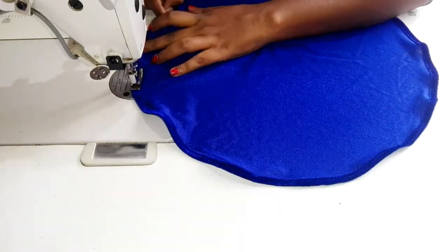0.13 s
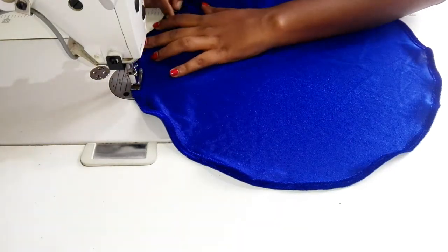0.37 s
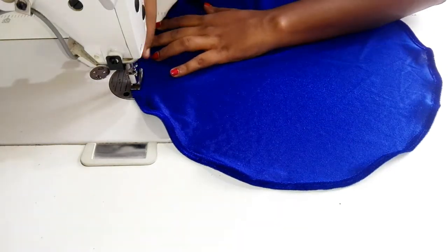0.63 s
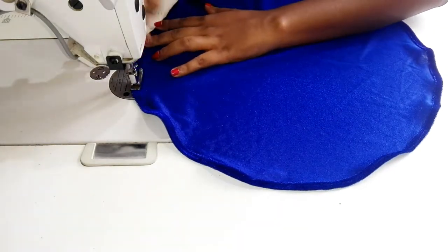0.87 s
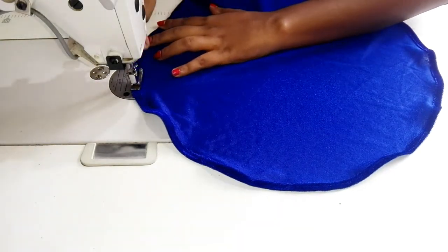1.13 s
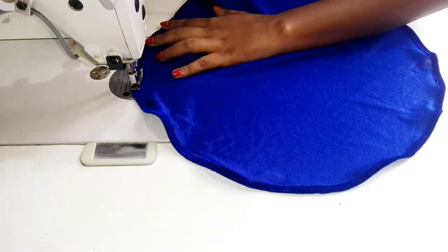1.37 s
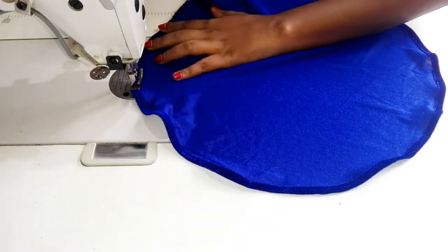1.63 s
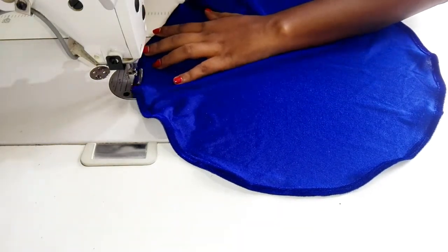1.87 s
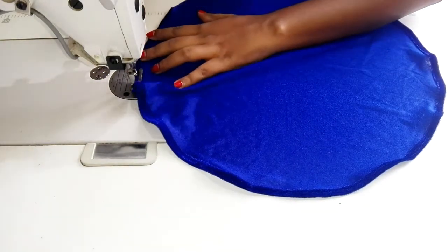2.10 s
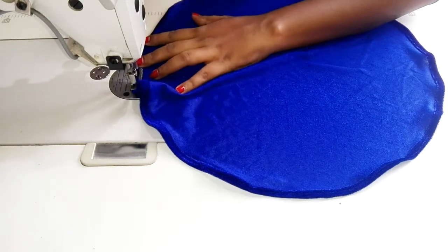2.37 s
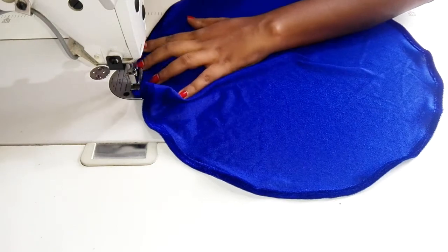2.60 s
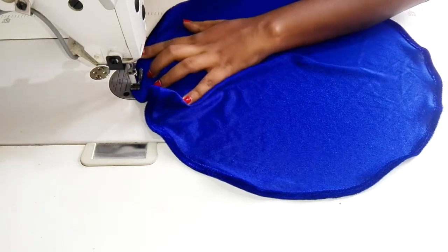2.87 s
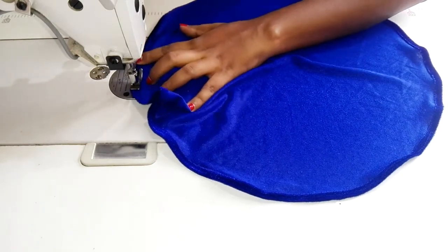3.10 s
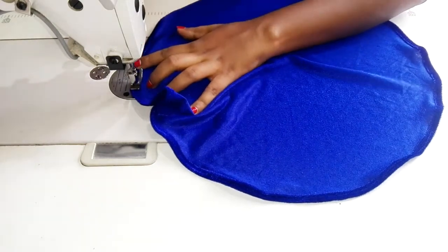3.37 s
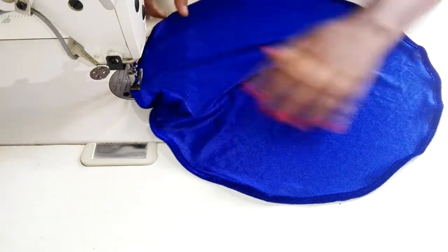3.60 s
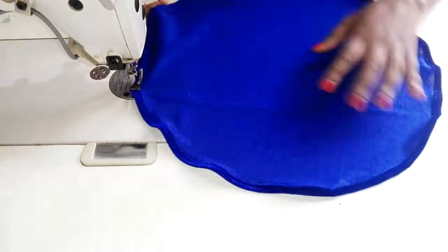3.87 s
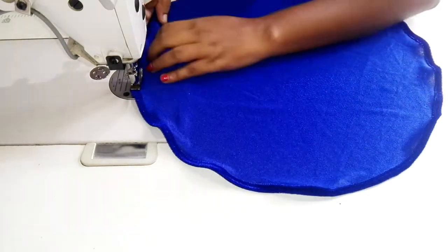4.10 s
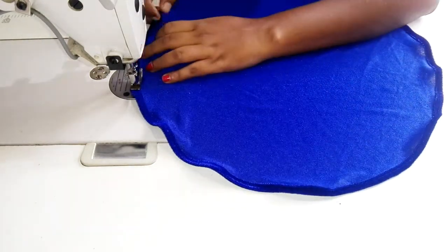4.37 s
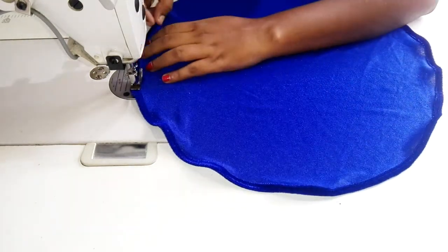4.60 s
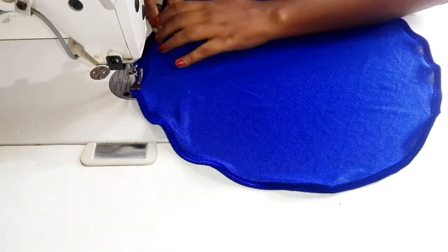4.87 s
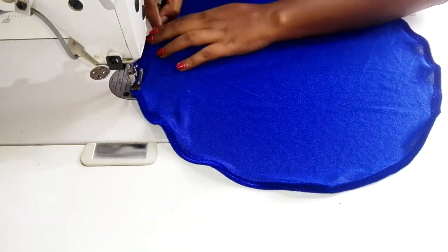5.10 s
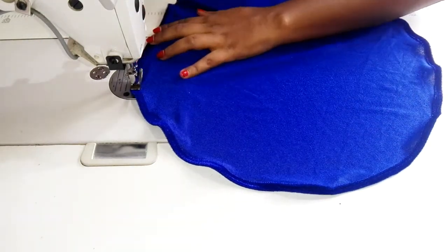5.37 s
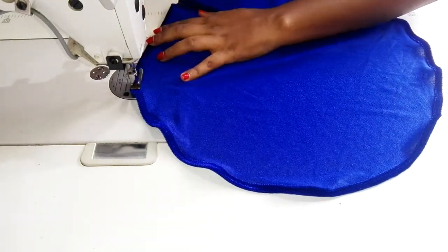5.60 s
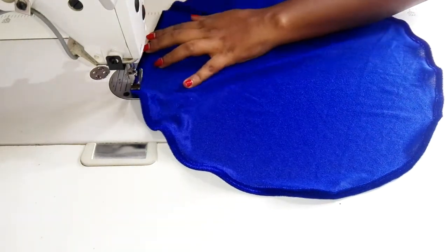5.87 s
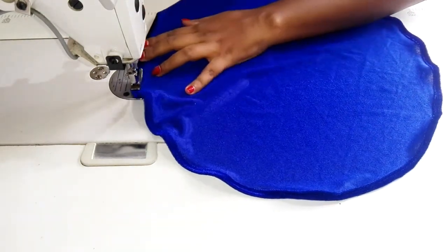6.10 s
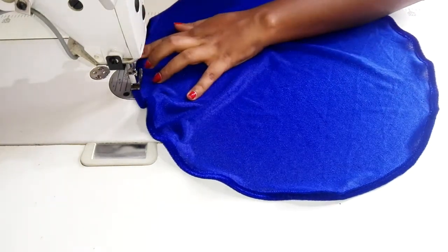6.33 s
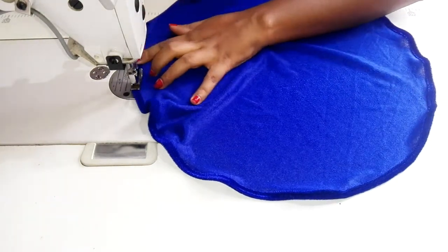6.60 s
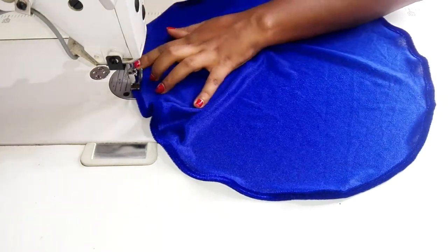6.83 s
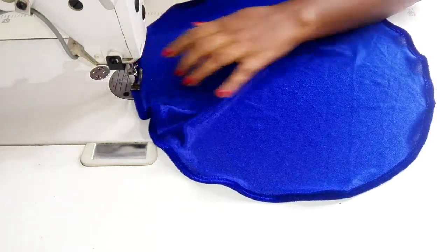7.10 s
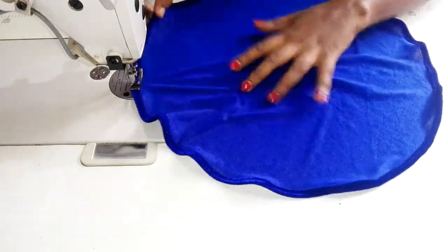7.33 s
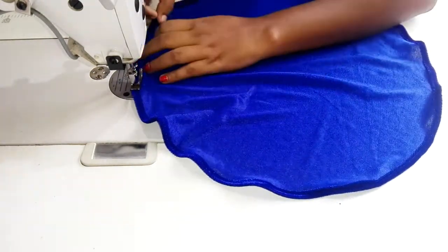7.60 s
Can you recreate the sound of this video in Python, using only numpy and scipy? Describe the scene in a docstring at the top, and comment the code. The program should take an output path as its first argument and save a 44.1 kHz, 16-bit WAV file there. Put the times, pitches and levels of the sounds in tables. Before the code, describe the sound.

Close, fast metallic ticking and gritty gear whirr from a sewing machine run twice for under two seconds, each stopping with a small knock in a quiet room.

```python
"""An electric sewing machine stitches satin in two short bursts on a table top, close to a small recorder.
Steel blows ring the needle plate, hook and arm as decaying noise through resonances; gear whirr is gritty
noise through the same bodies, with a motor hum. The table thuds, the brake knocks at each stop, a hand tugs
and strokes the cloth in noise bursts and gliding hiss, and the room adds faint air noise and rumble."""
import sys
import numpy as np
from scipy import signal
from scipy.fft import rfft, irfft, next_fast_len
from scipy.io import wavfile
from scipy.ndimage import uniform_filter1d, minimum_filter1d, map_coordinates

SR = 44100
rng = np.random.default_rng(int(sys.argv[2]) if len(sys.argv) > 2 else 0)


def gain_from_db(level_db):
    """Convert decibel levels to linear amplitude factors (20 dB per decade)."""
    decades = np.asarray(level_db, float) / 20
    return 10 ** decades


def master(y):
    """Save y as 16-bit WAV."""
    cut = np.clip(np.atleast_2d(y).T, -1, 1)
    pcm = np.round(cut * 32767)  # scale
    wavfile.write(sys.argv[1], SR, pcm.astype(np.int16))


N = 340298  # length [samples]

# Events
# steel blows on the needle plate, one a stitch plus a few rebounds:
# (time [s], plate ring peak [dB], contact length before each part's scaling [ms])
BLOWS = [(1.474, -32, 1.7), (1.484, -47, 7.6), (1.515, -48, 2.0), (1.5813, -34.5, 1.1),
         (1.6273, -32.5, 1.3), (1.6381, -32.5, 1.1), (1.686, -36, 2.3), (1.74, -34.5, 2.9),
         (1.7484, -39, 4), (1.7948, -42, 1.7), (1.8898, -31, 1.1), (1.933, -40, 1.2), (2.0182, -41, 3.2),
         (2.0719, -28.5, 0.89), (2.1244, -30, 1.4), (2.1658, -31, 0.79), (2.214, -31, 1.4),
         (2.2594, -33, 1.0), (2.2987, -42, 0.8), (2.352, -34.5, 3.6), (2.4073, -28, 1.2),
         (2.4558, -29.5, 1.7), (2.4912, -34, 1.3), (2.54, -31.5, 1.0), (2.5938, -33.5, 1.2),
         (2.6307, -35, 1.1), (2.677, -35.5, 1.9), (2.728, -31, 1.4), (2.7698, -35, 2.2),
         (2.8233, -30.5, 2.4), (2.875, -31.5, 1), (2.934, -34, 1.8), (2.966, -35.5, 3.8), (3.012, -34, 1.2),
         (3.0726, -46, 0.86), (3.1282, -44.5, 3), (3.2377, -33.5, 1), (3.3795, -36, 4.5), (3.3907, -43, 10),
         (5.4434, -46, 1.6), (5.542, -34, 1.5), (5.5598, -32.5, 2.6), (5.632, -33.5, 0.84),
         (5.6753, -30, 2.9), (5.7212, -29.5, 0.73), (5.7684, -36, 0.98), (5.845, -32.5, 1.3),
         (5.9065, -31, 2.4), (5.9394, -30.5, 0.94), (5.974, -38, 0.8), (6.004, -30, 1.3), (6.0482, -38, 2),
         (6.0903, -30.5, 1.33), (6.1258, -32.5, 2.7), (6.151, -45, 2.1), (6.184, -29, 1.2),
         (6.2149, -28, 0.72), (6.2492, -32, 0.86), (6.274, -31.5, 3), (6.31, -35.5, 2), (6.3521, -31, 2.1),
         (6.401, -40, 3.3), (6.4821, -44.5, 1.1), (6.533, -31.5, 1.75), (6.5807, -32.5, 1),
         (6.6308, -31, 0.86), (6.67, -34, 1.6), (6.723, -34.5, 1.6), (6.7712, -33, 1.3), (6.8753, -41, 1.5)]
# thin hook ticks, mostly about halfway between two blows: (time [s], peak [dB])
HOOK_TICKS = [(1.468, -40), (1.5401, -58), (1.7127, -41), (1.7684, -45), (1.8812, -45), (2.043, -40),
              (2.1394, -39), (2.2327, -32), (2.3133, -40), (2.5268, -39), (2.6164, -41), (2.6577, -40),
              (2.7062, -39), (2.7463, -39), (2.805, -41), (2.853, -40), (2.8959, -43), (2.99, -40),
              (3.0315, -39), (5.6018, -47), (5.6944, -36), (5.7462, -38), (5.7764, -39), (5.8307, -47),
              (5.8556, -46), (5.8991, -47), (5.9853, -43), (6.1762, -31), (6.268, -35), (6.3283, -41),
              (6.362, -44), (6.374, -39), (6.4331, -47), (6.5493, -36), (6.5996, -33), (6.6501, -33),
              (6.6957, -36), (6.7396, -37), (6.922, -53)]
# dull clacks of slack in the arm's linkage: (time [s], peak [dB])
LINKAGE_CLACKS = [(1.399, -53), (1.409, -59), (2.12, -35.5), (2.4, -39), (2.925, -40), (3.449, -48.5),
                  (5.358, -58), (6.176, -34), (6.267, -38), (6.346, -35), (6.922, -46.5)]
# single arm resonances as the drive takes up or stops: (time [s], peak [dB], frequency [Hz], decay [ms])
ARM_PINGS = [(1.398, -58, 2520, 5), (1.408, -52, 3510, 3.4), (1.47, -54, 3080, 6), (1.47, -58, 1880, 7),
             (1.542, -54, 1410, 28), (1.684, -44, 3050, 3.5), (5.527, -57, 3100, 18), (6.923, -52, 4720, 5)]
# frame jerks as the drive grips, surges or brakes: (time [s], peak [dB])
FRAME_JOLTS = [(1.685, -47), (1.8, -45.5), (2.017, -46), (2.33, -43), (2.8, -48), (2.85, -43.5),
               (3.359, -56), (5.578, -39.5), (5.848, -44.5), (6.125, -43), (6.929, -49.5)]
# brake and pedal knocks: (time [s], peak [dB], rattle decay [ms])
BRAKE_KNOCKS = [(3.331, -39, 17), (3.35, -46, 28), (6.92, -45.5, 21)]
# cloth tugs: (time [s], peak [dB], decay [ms])
CLOTH_TUGS = [(7.0733, -55.5, 5), (7.0988, -54, 4.3), (7.116, -47.5, 3.7), (7.134, -52, 4.5),
              (7.149, -45, 4.4), (7.1622, -51, 8.9), (7.177, -45.5, 13), (7.278, -58.5, 5)]
# rumble swells as the table rocks: (middle [s], peak [dB], half length to 1/e power [s])
RUMBLE_SWELLS = [(1.8, -57, 0.059), (2.38, -48, 0.039), (2.878, -53, 0.066), (3.387, -51.5, 0.046),
                 (3.572, -55, 0.03), (5.608, -57, 0.018), (6.0, -50.5, 0.23), (6.904, -59.5, 0.088)]

# Courses in time
# how hard the drive runs, one list a burst: (time [s], nominal gear whirr level [dB])
DRIVE_LEVEL = [
    [(1.37, -73), (1.43, -73.5), (1.53, -63.5), (1.6, -54.5), (1.7, -51), (1.9, -50.5), (2.4, -50),
     (2.95, -50), (3.145, -56), (3.18, -79), (3.36, -70.5), (3.4, -63), (3.455, -69), (3.48, -83)],
    [(5.4, -74), (5.46, -64), (5.5, -73), (5.57, -57), (5.64, -53.5), (5.75, -50.5), (5.8, -46),
     (6.0, -45.5), (6.3, -46.5), (6.37, -50.5), (6.45, -59), (6.52, -63), (6.56, -58.5), (6.7, -57),
     (6.8, -58.5), (6.82, -75), (6.89, -64.5), (6.95, -73), (6.98, -87)],
]
# motor hum: (time [s], mean pitch [Hz], mean level [dB])
MOTOR_HUM = [
    [(1.6, 270, -68), (2.3, 270, -59.5), (2.5, 271, -52.5), (2.9, 270.8, -58.5), (3.12, 274.4, -75)],
]
# hand on satin, one list a stroke: (time [s], level [dB], band centre [Hz])
HAND_STROKES = [
    [(3.76, -92, 4880), (3.85, -79, 5400), (3.92, -73, 5940), (3.98, -82, 5570), (4.04, -90, 5200)],
    [(7.3, -84, 5300), (7.35, -73, 5540), (7.4, -68, 5820), (7.44, -65, 5400), (7.52, -88, 4900)],
]
# floor-borne rumble: (time [s], level [dB])
RUMBLE_LEVEL = [(0, -59.5), (1.3, -60.5), (4, -63), (5.1, -64), (7.72, -63)]

# Resonances of each body: (frequency [Hz], width [Hz], relative level [dB])
PLATE_MODES = [(8690, 400, -13), (8820, 100, -1.5), (8831, 117, 2.5)]  # needle plate
HOOK_MODES = [(9900, 700, -15.5), (10270, 420, -4.5), (10870, 370, 0.5), (11840, 1070, -3),
              (13770, 1340, 1), (14180, 530, 1)]  # hook and other small steel parts
ARM_MODES = [(1222, 246, -6.5), (1403, 141, -2), (1804, 340, -4), (2468, 164, 0.5), (3080, 220, 0),
             (3583, 220, -1), (3650, 440, -3), (4675, 330, -3), (5540, 900, -9), (6870, 590, -8),
             (7520, 270, -6)]  # machine arm casting
TABLE_MODES = [(191, 48, -9), (270, 28, 0), (315.5, 52, -6.5), (428, 29.6, -7), (550, 28, -2),
               (671, 59, -9.5)]  # table top
FRAME_MODES = [(54, 27, -7), (118.5, 22.4, -2.5), (160, 59, -10)]  # table frame
BRAKE_MODES = [(636, 103, 4), (903, 47, 14), (1370, 200, 5), (1890, 180, -0.5), (2190, 130, 3.5),
               (2751, 290, -5), (4840, 700, -14.5)]  # brake housing
TOP_RATTLE_MODES = [(846, 270, -3), (903, 57, 2), (1090, 210, -8)]  # table top rattling near full speed

# Spectra: (frequency [Hz], relative density [dB per Hz])
CLOTH_SPECTRUM = [(1200, -22), (2400, -7), (4300, 0), (5200, -2), (6700, -9), (8800, -3.5), (13000, -8),
                  (15000, -10)]  # tugged cloth
AIR_SPECTRUM = [(88, -34), (150, -9), (215, -6.5), (246, -2), (270, -13), (297, -6), (387, -18.5),
                (443, -14.5), (505, -21.5), (698, -16), (1040, -12.5), (2440, -21), (14000, -33)]  # room and recorder noise
RUMBLE_SPECTRUM = [(12, -43), (20, -16), (32, -0.5), (48, 0.5), (108, -8), (161, -15.5), (180, -19.5),
                   (230, -46), (400, -120)]  # floor-borne rumble

# treble unlike on the two sides: (frequency [Hz], nominal side minus mid [dB])
SIDE_LEVEL = [(3500, -39), (4500, -15), (6000, -3), (14000, 0)]
# reverberation: (frequency [Hz], t60 [s])
ROOM_T60 = [(300, 0.35), (3000, 0.089), (12000, 0.047)]


def unit(x):
    """Scale to rms 1."""
    return x / np.sqrt(np.mean(x ** 2) + 1e-20)


def along(points, hz):
    """Interpolate (frequency [Hz], value) points on a log axis."""
    f, v = np.transpose(points)
    return np.interp(np.log(hz + 1), np.log(f + 1), v)


def curves(*tables, rest=-120):
    """One value per sample for each column after the time; rest outside the tables."""
    t = np.arange(N) / SR
    out = np.full((len(tables[0][0]) - 1, N), float(rest))
    for rows in tables:
        s, *cols = np.transpose(rows)
        inside = (t >= s[0]) & (t <= s[-1])
        out[:, inside] = [np.interp(t[inside], s, c) for c in cols]
    return out


def wobble(rate_hz):
    """Smooth random curve with rate_hz knots a second."""
    knots = rng.standard_normal(int(N * rate_hz / SR) + 4)
    return map_coordinates(knots, [np.arange(N) * rate_hz / SR])


def filtered(x, transfer):
    """Apply a complex transfer function of frequency."""
    m = next_fast_len(N + SR // 2)
    return irfft(rfft(x, m) * transfer(np.fft.rfftfreq(m, 1 / SR)), m)[..., :N]


def coloured(spectrum):
    """Noise of rms 1 with the given spectrum."""
    return unit(filtered(rng.standard_normal(N), lambda hz: gain_from_db(along(spectrum, hz))))


def response(modes):
    """Causal sum of a body's resonances, scaled so that white noise keeps its rms."""
    def body(f):
        return sum((-1) ** k * gain_from_db(db) * 1j * f * width / (centre ** 2 - f * f + 1j * f * width)
                   for k, (centre, width, db) in enumerate(modes))
    return lambda f: body(f) / np.sqrt(np.mean(np.abs(body(f)) ** 2))


def rung(force, modes):
    """A lasting force through a body's resonances."""
    return filtered(force, response(modes))


def bursts(times_s, peak_db, decay_ms, colour, rise=0.1, lead_db=-40):
    """Contacts as coloured noise, swelling over rise * decay_ms, then dying."""
    early, size, lead_ms = SR // 50, SR // 4, 3
    t_ms = (np.arange(size) - early) / SR * 1000
    after = np.maximum(t_ms, 0)
    life = np.maximum(decay_ms, .05)[:, None]
    shape = (1 - np.exp(-after / (max(rise, .01) * life))) * np.exp(-after / life)
    # soft noise swells up just before each contact and fades after it
    lead_in = gain_from_db(lead_db) * np.exp(-np.abs(t_ms) / lead_ms)
    force = shape / shape.max(axis=1, keepdims=True) + lead_in
    force = force * rng.standard_normal(force.shape)
    sounds = irfft(rfft(force) * colour(np.fft.rfftfreq(size, 1 / SR)), size)
    out = np.zeros(N + size)
    for s, db, sound in zip(times_s, peak_db, sounds):
        out[round(s * SR):][:size] += gain_from_db(db) * sound / np.abs(sound).max()
    return out[early:][:N]


def over_cruise_db():
    """Whirr level per sample over its level at the usual sewing speed."""
    cruise_db = -51
    return curves(*DRIVE_LEVEL)[0] - cruise_db


def effort(times_s):
    """Whirr over cruise [dB] at the given times, no lower than a crawl."""
    return np.maximum(over_cruise_db()[np.round(times_s * SR).astype(int)], -20)


def background():
    """Steady air noise over a rumble that swells now and then; powers add."""
    air_db = -66.5
    t = np.arange(N) / SR
    power = gain_from_db(2 * curves(RUMBLE_LEVEL)[0])
    for middle_s, db, half_s in RUMBLE_SWELLS:
        power = power + gain_from_db(2 * db) * np.exp(-((t - middle_s) / half_s) ** 2)
    return gain_from_db(air_db) * coloured(AIR_SPECTRUM) + np.sqrt(power) * coloured(RUMBLE_SPECTRUM)


def drive():
    """Gear teeth and hook rub in dense, uneven grains; each arm resonance also flares on its own."""
    whirr_db, = curves(*DRIVE_LEVEL)
    over_db = over_cruise_db()
    hiss_db = -58 + 0.93 * over_db
    drone_db = -55.5 + 0.77 * over_db
    load_db = 0.87 * wobble(35)  # shaft load varies within each turn, shakes every part alike

    def grit(rough_db, rate_hz):
        return unit(gain_from_db(load_db + rough_db * wobble(rate_hz)) * rng.standard_normal(N))

    flares = unit(sum(gain_from_db(db) * np.sqrt(width) * rung(grit(4.6, 70), [(centre, width, db)])
                      for centre, width, db in ARM_MODES))
    whirr = gain_from_db(whirr_db) * (gain_from_db(-3.5) * flares + gain_from_db(-4.5) * rung(grit(1.05, 120), ARM_MODES))
    small_parts = rung(grit(3.1, 150), HOOK_MODES)
    hiss = gain_from_db(hiss_db) * (small_parts + gain_from_db(-5.5) * rung(grit(1.9, 150), PLATE_MODES))
    drone = gain_from_db(drone_db - 3.5) * rung(grit(2.5, 40), TABLE_MODES)
    shake = gain_from_db(drone_db - 9.0) * rung(grit(3.7, 25), FRAME_MODES)
    buzz_db = 3.4 * (whirr_db + 46) - 62  # steep: sets in only near full speed
    buzz = gain_from_db(buzz_db) * rung(grit(2.9, 60), TOP_RATTLE_MODES)
    return whirr + hiss + drone + shake + buzz


def pings():
    """Single arm resonances, each kept going by a short rub."""
    width_hz = 70
    return sum(bursts([s], [db], [ms], response([(hz, width_hz, 0)])) for s, db, hz, ms in ARM_PINGS)


def clacks():
    """Linkage slack knocks the arm alone."""
    s, db = np.transpose(LINKAGE_CLACKS)
    return bursts(s, db, np.full(len(s), 2.8), response(ARM_MODES), rise=1.0, lead_db=-1)


def hook_ticks():
    """Short contacts ring the small steel parts alone."""
    s, db = np.transpose(HOOK_TICKS)
    return bursts(s, db, np.full(len(s), 1.4), response(HOOK_MODES), rise=0.41, lead_db=-23)


def thuds():
    """The reversing needle bar shoves table top and frame; the soft push favours the low modes."""
    lead_s, soft_ms, soft_hz = 0.00299, 6.5, 420
    blow_s = np.transpose(BLOWS)[0]
    s = blow_s - lead_s
    db = -47.5 + 0.54 * effort(s) + 2.32 * rng.standard_normal(len(s))
    decay_ms = np.full(len(s), soft_ms)

    def soft_top(f):
        return response(TABLE_MODES)(f) / (1 + 1j * f / soft_hz) ** 2

    top = bursts(s, db, decay_ms, soft_top, rise=0.55)
    frame = bursts(s, db - 9, 0.59 * decay_ms, response(FRAME_MODES))
    return top + frame


def blows():
    """Each blow rings the plate; slow blows are duller; the arm answers more to speed than to the blow."""
    s, ring_db, contact_ms = np.transpose(BLOWS)
    speed_db = effort(s)
    tick_chance, arm_chance = rng.standard_normal((2, len(s)))
    tick_db = ring_db + 0.48 * np.minimum(speed_db, 0) + 2.0 * tick_chance
    arm_db = -40 + 0.52 * speed_db + 0.38 * (ring_db - ring_db.mean()) + 2.3 * arm_chance
    ring = bursts(s, ring_db, 0.87 * contact_ms, response(PLATE_MODES), rise=0.52, lead_db=-17)
    tick = bursts(s, tick_db, 1.4 * contact_ms, response(HOOK_MODES), rise=0.39, lead_db=-25)
    arm = bursts(s, arm_db, 1.39 * contact_ms, response(ARM_MODES), rise=0.94, lead_db=1)
    # loose parts shiver after the blow
    loose = response(ARM_MODES + HOOK_MODES + PLATE_MODES)
    rattle = bursts(s, ring_db - 24, np.full(len(s), 11), loose)
    return ring + tick + arm + rattle


def hum():
    """Motor tone and octave: the pitch wavers, the strengths throb."""
    hz, db = curves(*MOTOR_HUM)
    phase = 2 * np.pi * np.cumsum(hz * (1 + 0.0112 * wobble(29.86))) / SR
    tone = gain_from_db(db + 2.5 * wobble(29.9)) * np.sin(phase)
    octave = gain_from_db(db - 6.0 + 3.8 * wobble(32.94)) * np.sin(2 * phase)
    return tone + octave


def jolts():
    """Jerks of the drive ring the table frame."""
    s, db = np.transpose(FRAME_JOLTS)
    return bursts(s, db, np.full(len(s), 5.5), response(FRAME_MODES))


def knocks():
    """The brake housing rattles briefly."""
    return bursts(*np.transpose(BRAKE_KNOCKS), response(BRAKE_MODES), rise=0.013)


def strokes():
    """Hand on weave: a hiss band whose centre follows the speed of the hand."""
    db, hz = curves(*HAND_STROKES)
    spread_hz = 700
    phase = 2 * np.pi * np.cumsum(hz) / SR

    def slow_noise():
        return unit(filtered(rng.standard_normal(N), lambda f: np.exp(-(f / spread_hz) ** 2 / 2)))

    return gain_from_db(db) * (slow_noise() * np.cos(phase) + slow_noise() * np.sin(phase))


def tugs():
    """Tugged cloth crackles broadly."""
    return bursts(*np.transpose(CLOTH_TUGS), lambda hz: gain_from_db(along(CLOTH_SPECTRUM, hz)))


def room(x):
    """Delayed noise tail, each frequency dying at its own speed."""
    hz, t, z = signal.stft(rng.standard_normal(SR // 2), SR, nperseg=256)
    decay = gain_from_db(-60 * t / along(ROOM_T60, hz)[:, None])
    tail = signal.istft(z * decay, SR, nperseg=256)[1]
    delayed = np.pad(x, (150, 0))  # [samples]
    return signal.fftconvolve(delayed, tail / np.linalg.norm(tail))[:N]


def stereo(x):
    """Shared centre; noise unlike left and right fills steady treble in patches, brief peaks are spared."""
    hz, _, z = signal.stft(x, SR, nperseg=1024)
    # smooth over frequency, minimum over time: brief peaks drop out
    steady = minimum_filter1d(uniform_filter1d(np.abs(z), size=16, axis=0), size=3, axis=1)
    field = uniform_filter1d(rng.standard_normal(z.shape), size=50, axis=0)
    field = uniform_filter1d(field, size=3, axis=1)
    patches = unit(field) > -.3
    noise = signal.stft(rng.standard_normal(N), SR, nperseg=1024)[2]
    noise = noise / np.abs(noise).mean()
    unlike = noise * steady * patches * gain_from_db(along(SIDE_LEVEL, hz))[:, None]
    side = signal.istft(unlike, SR, nperseg=1024)[1][:N]
    return np.array([x + side, x - side])


def scene():
    """Machine and cloth in the room, over the background."""
    machine = drive() + pings() + clacks() + hook_ticks() + blows() + hum()
    near = machine + thuds() + jolts() + knocks() + strokes() + tugs()
    return stereo(near + gain_from_db(-13.0) * room(near) + background())


def top_cut(x):
    """Nothing passes above the cut-off."""
    return signal.sosfilt(signal.butter(12, 15640, fs=SR, output="sos"), x)


def record(dry):
    """The treble is cut steeply near 14.4 kHz, leaving a little above."""
    edge_hz, leak_db = 14400, -30

    def top(hz):
        return 1 / np.sqrt(1 + (hz / edge_hz) ** 240) + gain_from_db(leak_db)

    return top_cut(filtered(dry, top))


dry = scene()
out = record(dry)
master(out)
```